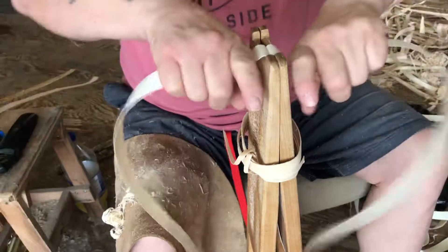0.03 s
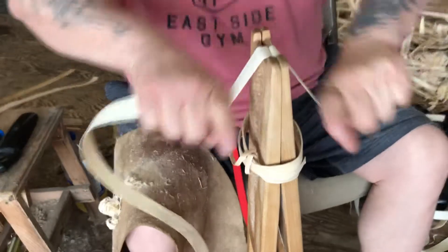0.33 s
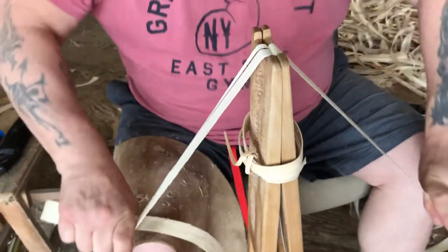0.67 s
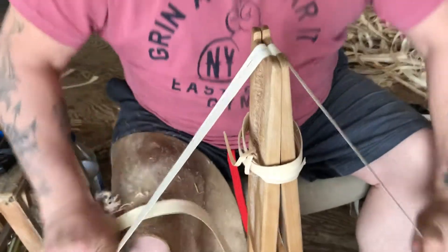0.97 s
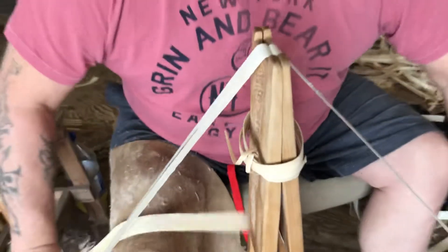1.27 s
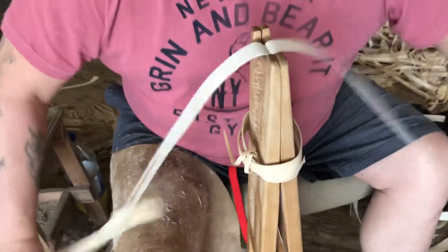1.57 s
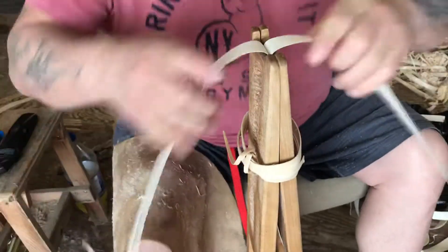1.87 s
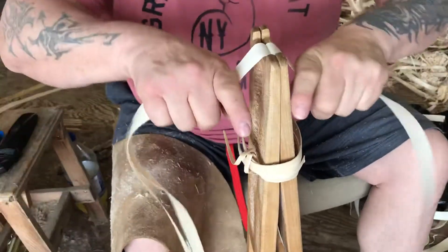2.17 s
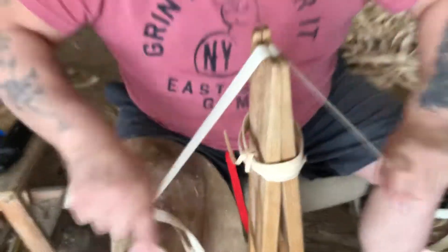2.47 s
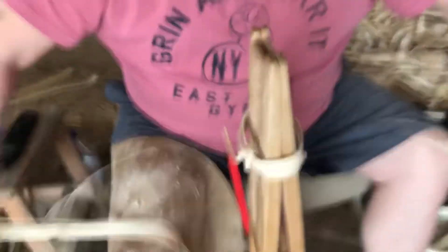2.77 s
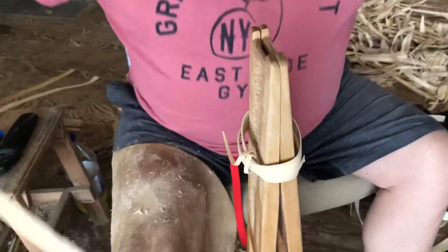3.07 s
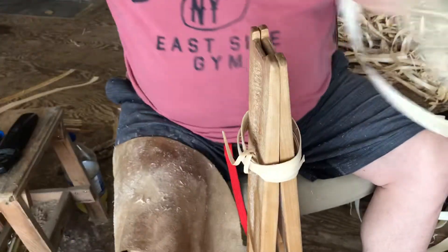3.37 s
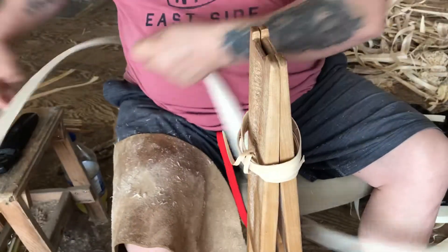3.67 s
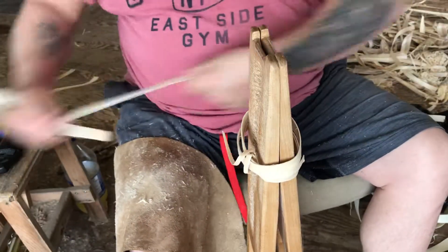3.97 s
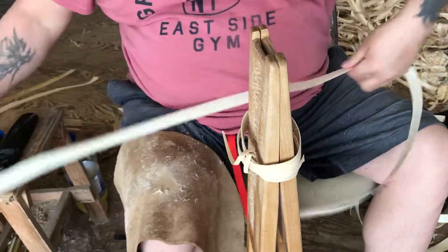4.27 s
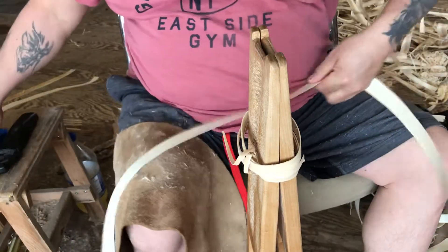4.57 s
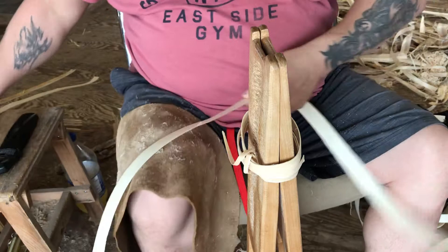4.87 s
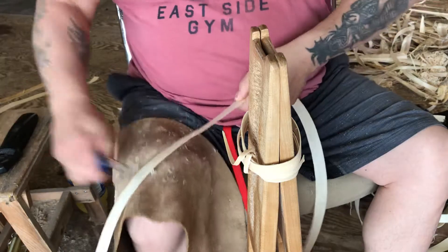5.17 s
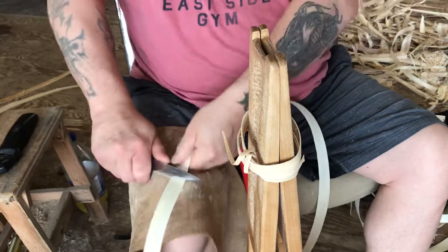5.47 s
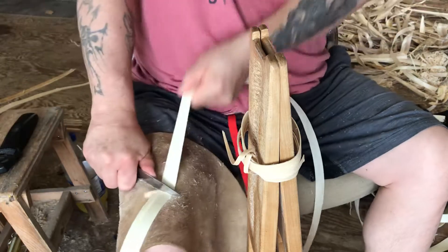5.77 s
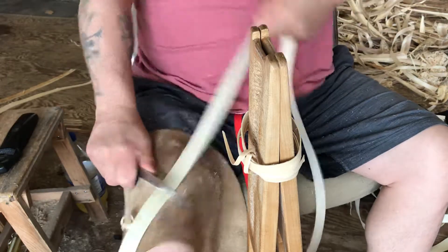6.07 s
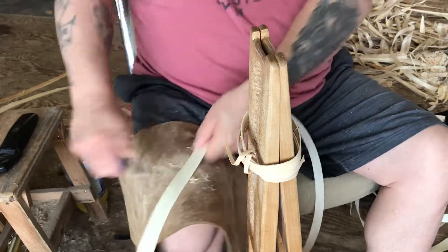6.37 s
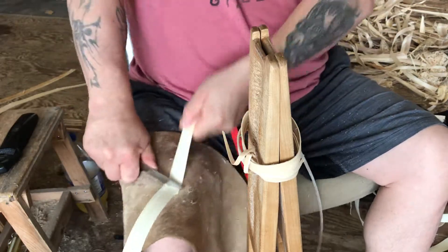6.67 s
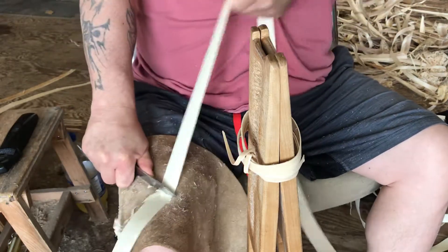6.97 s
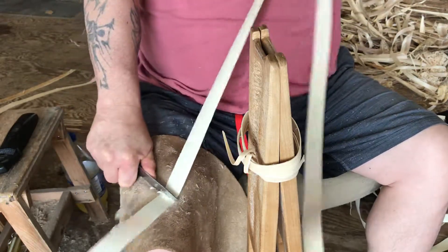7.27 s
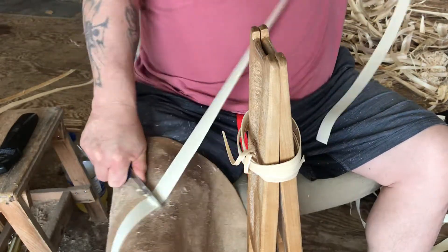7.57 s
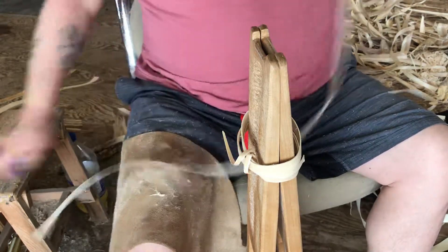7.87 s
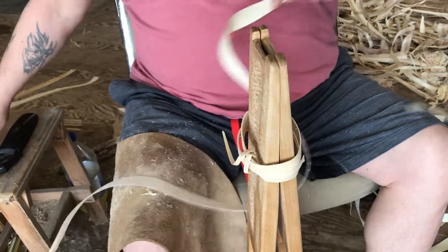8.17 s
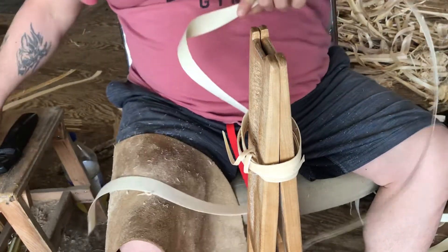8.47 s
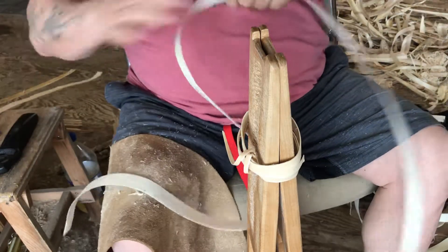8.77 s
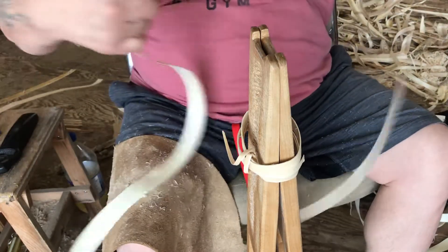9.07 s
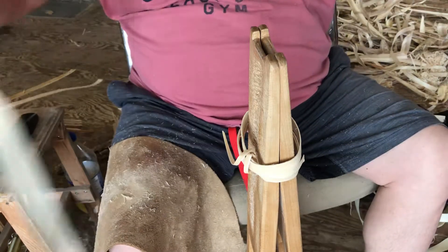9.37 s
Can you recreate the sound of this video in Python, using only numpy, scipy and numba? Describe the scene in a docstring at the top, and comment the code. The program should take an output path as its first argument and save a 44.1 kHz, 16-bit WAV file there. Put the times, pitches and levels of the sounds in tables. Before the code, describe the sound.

A steady low electrical hum fills a small workshop, and all the action is close, with a little room reverberation. From the start, a thin wooden splint is pulled apart in short fibrous rips at about 0.5, 1.1, 1.5, 2.5 and 2.8 seconds, with faint crackling and low drumming from the taut halves. The last pull brings a sharp, loud crack. From 3 to 5.3 seconds the springy strip ticks, slaps and knocks hollowly, hissing through the fingers around 4 seconds. A knife rasps along the wood from 5.6 to 6.1 seconds, then again for longer from 6.5 to 7.8, bright and uneven with shifting pitch and a few sharp clicks. Around 8.5 seconds come hollow knocks, dull thuds and dry snaps. A soft sliding hiss follows from about 9 seconds, over the continuing hum.

```python
"""Splitting and scraping a basket splint

A basket maker pulls a wooden splint apart in a wooden clamp: fibres tear in bunches and the taut
halves drum. The springy strip ticks, slaps, knocks and hisses through the fingers, then is drawn
twice under a knife on a leather knee pad, the edge rasping as it sticks and slips on the grain.
A mains hum fills the small workshop."""
import sys
import numpy as np
from scipy import signal
from scipy.fft import rfft, irfft
from scipy.io import wavfile
from scipy.ndimage import uniform_filter1d, map_coordinates
from numba import njit

SR = 44100
rng = np.random.default_rng(int(sys.argv[2]) if len(sys.argv) > 2 else 0)


def persist_wave(psi):
    """Save psi, clipped to +-1, as 16-bit WAV."""
    counts = np.round(np.clip(psi, -1, 1) * 32767).astype(np.int16)
    wavfile.write(sys.argv[1], SR, np.atleast_2d(counts).T)


N = 415863
TIME = np.arange(N) / SR
TOP_HZ = 16000
HISS_SHAPE = 1.96  # a rounder swell: fine hiss holds its level, then stops short

# mains hum partials: (frequency [Hz], rms level [dB])
HUM_PARTIALS = [(58.8, -39), (117.6, -60.5), (294, -65.5), (352.8, -72.5)]
# workshop reverb: (frequency [Hz], t60 [s])
ROOM_DECAY = [(120, 0.89), (500, 0.64), (1500, 0.45), (4000, 0.33), (8000, 0.28), (15000, .12)]
# EQ of room air, touched wood, sliding skin, blade rasp and tearing fibres: (frequency [Hz], gain [dB])
AIR_EQ = [(60, 9.5), (110, 1), (180, 4), (280, -5), (420, -7), (800, -7.5), (1500, -9), (4200, -16),
          (7000, -25), (16000, -25)]
WOOD_EQ = [(150, 19), (400, 2.5), (800, 4.5), (1200, 4), (2300, 0.5), (3000, 1), (4300, 2), (5200, -2),
           (9000, -2), (12000, -2), (16000, -15)]
SLIDE_EQ = [(600, -48), (1400, -8), (2400, 3), (3900, 4.5), (7600, -1.5), (9000, -0.5), (12000, -6),
            (16000, -9)]
RASP_EQ = [(150, -31), (350.0, -12), (550.0, -19), (800.0, -18), (1100.0, -6), (1600.0, -1.4),
           (2200.0, -0.8), (3200.0, -4.5), (4600.0, -5.0), (6200.0, -9.0), (7600.0, -11), (9200.0, -10.5),
           (12000.0, -10), (16000.0, -20)]
TEAR_EQ = [(200, -2), (300, 0), (420, -14), (570, -0.5), (780, -6.5), (1270, -5), (1880, -4), (2350, -3),
           (3000, -1), (4400, -1), (5000, -2), (8800, -3.5), (11800, -6.5), (16000, -13.5)]
# resonances of hard-struck wood: (frequency [Hz], width [Hz], gain [dB])
WOOD_RESONANCES = [(580, 50, 5), (1250, 280, 7), (1600, 200, 1), (2330, 280, 10), (3350, 300, 1),
                   (4400, 350, 4.5)]
# low resonances of the clamp and taut halves: (frequency [Hz], half-width per filter [Hz], gain [dB])
CLAMP_RESONANCES = [(98.3, 12.1, 9), (124, 11, -5.5), (174, 27, -10), (230, 103, -8.5), (264, 20, -2.5)]
# modes of a hollow knock: (base frequency [Hz], gain [dB], base t60 [s])
HOLLOW_MODES = [(404, -20, .2), (522, -3, .19), (619, 1, .2), (790, -12, .14), (856, -3, .16),
                (950, -8, .13), (1080, -11, .14), (1211, -6, .15), (1500, -15, .1)]
# hands and cloth brush the strip: (middle [s], length [s], level [dB], centre [Hz])
BRUSH_STROKES = [(0.058, 0.05, -45, 6500), (0.774, 0.18, -50, 5000), (1.264, 0.22, -54, 4850),
                 (1.764, 0.59, -57.5, 3700), (3.111, 0.11, -43, 2870), (3.564, 0.22, -49, 4200),
                 (4.4, 0.32, -54.5, 2800), (4.815, 0.036, -47.5, 3000), (5.156, 0.25, -62, 4300),
                 (5.459, 0.25, -46, 4400), (5.583, 0.093, -47, 3000), (6.124, 0.17, -45.5, 3500),
                 (6.37, 0.49, -53.5, 4030), (7.88, 0.12, -54, 3900), (7.98, 0.07, -55, 3900),
                 (8.29, 0.21, -52, 4500), (8.338, 0.39, -53, 680)]
# patches of crackling fibres: (start [s], end [s], peak ceiling [dB])
CRACKLE_PATCHES = [(0, 0.298, -41), (0.694, 0.951, -42), (1.208, 1.696, -36), (1.879, 2.245, -31),
                   (2.953, 3.596, -37), (4.252, 4.803, -38), (4.905, 5.599, -48), (6.202, 6.458, -36),
                   (7.8, 8.049, -44), (8.191, 8.603, -43)]
# the strip slides through the fingers: (fastest moment [s], level [dB], rise [s], fall [s],
# top octave gain [dB], resonance [Hz], its climb over one rise [octaves])
FINGER_SLIDES = [(4.069, -38, 0.2, 0.18, 3, 3720, .8), (9.07, -44.5, 0.15, 0.12, -3.5, 3920, .05),
                 (9.26, -49.5, 0.22, 0.45, -6, 3780, 0.65), (9.39, -47.5, 0.14, 0.13, -10, 3000, .05)]
# heavy thuds of the clamp and seat: (time [s], peak [dB], centre [Hz])
SEAT_THUDS = [(1.111, -25.5, 99), (2.779, -24.5, 255), (2.783, -24.5, 104), (5.058, -39, 123),
              (7.15, -37, 330), (8.4, -38, 158), (8.53, -27, 114), (8.666, -32, 99)]
# hollow knocks of the loose end: (time [s], peak [dB], centre [Hz], ring time [x base],
# travel along the strip at 1 kHz [s], pitch set by the free length [x base], width [x centre])
END_KNOCKS = [(2.11, -26, 820, 0.3, 0.00096, 1.3, 1.1), (2.161, -25.5, 800, 0.2, 0.00052, 1.53, 1.6),
              (3.685, -21.5, 775, 0.64, 0.0017, 1.2, 1), (4.121, -29.5, 700, 0.37, 0.0011, 1.03, 1.6),
              (4.488, -16, 567, 0.094, 0.0011, 1.1, 1.6), (4.816, -24.5, 1094, 0.46, 0.0096, 1.72, 1.35),
              (6.454, -37, 510, .7, 0.00074, .826, 0.2), (8.514, -18, 660, 1.23, 0.002, 1, 1.8),
              (8.541, -21, 560, 0.7, .002, 0.98, 1.5), (9.006, -35.5, 686, 0.082, 0.0013, 0.97, 1.6)]
# dry ticks and snaps: (time [s], peak [dB], centre [Hz], 30 dB decay [s], room send [dB])
STRIP_TICKS = [(0.053, -32, 6450, 0.022, -4), (.108, -31.5, 2340, 0.018, -9),
               (0.2316, -29.5, 4600, 0.026, -3), (0.681, -25.5, 3500, 0.015, -2),
               (1.058, -24.5, 2320, 0.011, -2), (1.316, -32, 1700, 0.017, -7),
               (1.547, -34, 3660, 0.0084, -10), (1.569, -28.5, 3700, 0.023, -5),
               (1.6, -31, 6300, 0.0065, -10), (1.627, -28, 5030, .008, -2), (1.765, -22.5, 5030, 0.013, -5),
               (1.941, -38, 5330, 0.011, 8), (3.236, -32, 3310, 0.022, -24), (3.296, -23, 4700, 0.007, -6),
               (3.371, -28, 5060, 0.011, -4), (3.487, -20.5, 2720, 0.012, 4),
               (3.567, -27, 4500, 0.014, -15), (3.616, -19.5, 2040, 0.016, 1.5),
               (3.757, -21, 4460, 0.037, 1), (4.166, -21.5, 5200, 0.025, -1),
               (4.225, -25, 3350, 0.015, 1.5), (4.272, -28, 3600, .006, -5),
               (4.3005, -28.5, 3670, 0.0081, -10), (4.6196, -21, 3440, 0.0042, -3),
               (4.954, -34.5, 4000, .02, 2), (5.237, -36, 6300, 0.0091, 5), (5.3, -25.5, 3700, 0.011, 1.5),
               (6.212, -31, 5900, 0.011, 7), (7.069, -20, 3400, 0.033, -14),
               (7.151, -16, 4500, 0.0086, -12), (8.1963, -24.5, 3620, 0.014, -4),
               (8.485, -25, 5130, 0.0069, 0), (8.517, -25, 4500, .008, -3), (8.6693, -16, 7000, 0.0061, -3),
               (8.718, -21.5, 3330, 0.0052, -3.5), (8.9184, -24, 2830, 0.01, -5)]
# the strip cracks, slaps wood or meets the blade:
# (time [s], peak [dB], centre [Hz], 30 dB decay [s], width [x centre], rise [s], room send [dB])
STRIP_SLAPS = [(1.111, -11.5, 1950, 0.017, 0.55, 0.0011, -6), (2.111, -25.5, 1310, .008, 8.3, 0.00063, 1),
               (2.16, -28, 1690, 0.027, 4.7, 0.0023, 1), (2.45, -9.5, 1930, 0.007, 0.73, 0.0022, -8.5),
               (2.781, -0.5, 2800, 0.02, 2, 0.00097, -9), (3.671, -12, 3190, 0.0078, 0.75, 0.00029, -1.5),
               (3.684, -15, 2050, 0.01, 2.2, 0.00037, -5), (3.691, -18.5, 2020, 0.083, 1.6, 0.0009, 0),
               (4.118, -9, 6840, 0.018, 1.6, 0.00407, -5.5), (4.487, -9, 1840, 0.0083, 0.94, .0002, -5),
               (6.5255, -7.5, 5000, 0.0006, 4.3, 0.00029, -12), (7.196, -11, 5000, 0.004, 3.8, 0.00029, -6),
               (8.6705, -12.5, 2630, 0.0087, 0.33, 0.00042, -12)]
# rasp envelopes, one per draw under the blade: (time [s], level before grip, ringing and trim [dB])
BLADE_DRAWS = [
    [(5.615, -49), (5.644, -33.5), (5.778, -29), (5.993, -24.5), (6.022, -28), (6.076, -44.5)],
    [(6.559, -52), (6.639, -30.5), (6.71, -28.5), (7.036, -32.5), (7.063, -40), (7.072, -31),
     (7.092, -25.5), (7.155, -25), (7.18, -35), (7.21, -30), (7.302, -36.5), (7.42, -35), (7.455, -31.5),
     (7.717, -39), (7.8, -62)],
]
# the blade contact rings in glides as its angle shifts:
# (start [s], end [s], from [Hz], to [Hz], gain over the rasp [dB], width [x centre])
BLADE_GLIDES = [(5.603, 6.078, 3910, 4100.0, 16.5, 0.37), (5.62, 5.953, 5850.0, 7100, 16, 0.25),
                (5.916, 6.083, 4600.0, 7100, 13, 0.2), (5.887, 6.158, 3100, 3060, 11.5, 0.43),
                (6.515, 7.045, 3720, 4560, 13, 0.41), (6.605, 6.87, 6160, 7100, 15.5, 0.17),
                (6.811, 7.016, 5330.0, 5240, 13, 0.14), (6.872, 7.102, 3130.0, 3600, 12.5, 0.23),
                (7.017, 7.173, 4040, 3370, 13.5, 0.24), (6.909, 7.063, 8100, 8540.0, 12.5, 0.15),
                (7.042, 7.308, 5970.0, 7200, 8.5, 0.21), (7.197, 7.357, 3150, 5400, 9.5, 0.25),
                (7.293, 7.415, 5310.0, 5200, 14, 0.14), (7.286, 7.457, 8190.0, 8000, 13.5, 0.21),
                (7.274, 7.695, 4170, 4100, 13.5, 0.3), (7.471, 7.809, 5110.0, 7520.0, 11, 0.25),
                (7.322, 7.774, 2100, 1430, 4.4, 0.25), (7.441, 7.777, 8300, 10170.0, 8.6, 0.32)]
# each pull runs the split further:
# (fastest moment [s], level [dB], rise [s], fall [s], top octave gain [dB], drumming level [dB])
SPLIT_PULLS = [(.46, -33.5, 0.17, 0.29, -3.5, -38.5), (1.117, -33, 0.17, 0.11, -3, -34),
               (1.454, -39.5, 0.094, 0.082, -2, -40.5), (1.6, -47, 0.076, 0.11, -11, -45.5),
               (2.472, -32.5, 0.15, 0.2, -1.5, -40.5), (2.799, -30, 0.18, 0.19, -5, -35.5)]


def undb(db):
    """Decibels to gain."""
    return 10 ** (np.asarray(db) / 20)


def unit(x):
    """Scale to rms 1."""
    return x / np.sqrt(np.mean(x ** 2))


def peak(x, db):
    """Scale to a peak level."""
    return x * undb(db) / np.abs(x).max()


def add(out, s, x):
    """Mix x into out at time s."""
    i = int(s * SR)
    out[i:i + len(x)] += x[:N - i]


def on_log(hz, points):
    """Read (frequency, value) points on a log-frequency axis."""
    freqs, values = np.transpose(points)
    return np.interp(np.log(np.maximum(hz, 1)), np.log(freqs), values)


def eq(x, points, size=2048):
    """Minimum-phase EQ that rolls off below its first point."""
    hz = np.arange(size // 2 + 1) * SR / size
    gain = undb(on_log(hz, points)) * np.minimum((hz + 1) / points[0][0], 1) ** 2
    cepstrum = irfft(np.log(gain))
    cepstrum[1:size // 2] *= 2
    cepstrum[size // 2 + 1:] = 0
    return signal.fftconvolve(x, irfft(np.exp(rfft(cepstrum))))[:len(x)]


@njit
def svf(x, hz, width):
    """State-variable band-pass, gain 1 at its moving centre."""
    y, band_state, low_state = np.empty(len(x)), 0., 0.
    for i in range(len(x)):
        g, damping = np.tan(np.pi * hz[i] / SR), width[i] / hz[i]
        passed = (band_state + g * (x[i] + 1e-18 - low_state)) / (1 + g * (g + damping))
        band_state = 2 * passed - band_state
        low_state += 2 * g * passed
        y[i] = damping * passed
    return y


def band(x, hz, width):
    """One resonance, steady or swept; width in Hz."""
    return svf(x, np.minimum(hz, TOP_HZ) * np.ones(len(x)), width * np.ones(len(x)))


def steep_band(x, hz, width):
    """The same resonance twice, for steeper skirts."""
    return band(band(x, hz, width), hz, width)


def split_top(x):
    """Cross over at 8 kHz into body and top octave, each at rms 1."""
    top = signal.sosfiltfilt(signal.butter(4, 8000, "high", fs=SR, output="sos"), x)
    return unit(x - top), unit(top)


def wander(rate):
    """Slewed random modulation, rate steps a second, rms 1."""
    hold = max(int(SR / rate), 1)
    steps = np.repeat(rng.standard_normal(N // hold + 1), hold)
    return unit(uniform_filter1d(steps, hold)[:N])


def grains(rate, spread_db):
    """Tiny random fractures of unequal size, rate a second, rms 1."""
    hit = rng.random(N) < rate / SR
    size = undb(spread_db * np.minimum(rng.exponential(size=N), 5))
    return unit(hit * size * rng.choice([-1, 1], N))


def swell(s, db, rise_s, fall_s, tilt_db=0, shape=1.34, drop_db=22.5):
    """Envelope of an arm movement that speeds up until s, then slows; tilt_db favours its start."""
    progress = np.clip((TIME - s) / np.where(TIME < s, rise_s, fall_s), -4, 4)
    return undb(db - drop_db * np.abs(progress) ** shape - tilt_db * progress)


def room_tone():
    """The bed: a motor's steady mains hum over faint air."""
    hum = 0
    for hz, db in HUM_PARTIALS:
        amplitude = np.sqrt(2) * undb(db + 0.12 * wander(2.07))
        hum += amplitude * np.sin(2 * np.pi * (hz * TIME + rng.random()))
    air = unit(eq(rng.standard_normal(N), AIR_EQ))
    return hum + undb(-54.5 + 0.042 * wander(2.3)) * air


def reverb(send, size=24000):
    """Diffuse workshop reflections build quickly and lose their treble first."""
    t, tail = np.arange(size) / SR, 0
    for hz in np.geomspace(125, 16000, 8):
        decay = undb(-60 * t / on_log(hz, ROOM_DECAY) - 4 * hz / 8000)
        tail += steep_band(rng.standard_normal(size), hz, hz) * decay
    tail *= 1 - np.exp(-t / 0.0026)
    mid_gain = np.sqrt(np.mean(np.abs(rfft(tail)[size // 50:size // 10]) ** 2))
    return signal.fftconvolve(send, tail / mid_gain)[:N]


def rustling():
    """Hands and cloth brush the strip, which never lies quite still."""
    pressure = undb(2.2 * wander(45))
    touch = grains(rate=5500, spread_db=2) * pressure + undb(-20) * grains(rate=300, spread_db=1)
    touch, out = eq(touch, WOOD_EQ), np.zeros(N)
    for s, length_s, db, hz in BRUSH_STROKES:
        contact = np.hanning(int(length_s * SR))
        start = s - length_s / 2
        stroke = touch[int(start * SR):][:len(contact)]
        add(out, start, unit(band(stroke, hz, 1.6 * hz)) * contact * undb(db))
    fidget = undb(-67 + 5 * wander(8)) * unit(band(touch, hz=3250, width=7600))
    return out + fidget


def crackling(per_s=150, spread_db=16, decay_s=0.0025, low_hz=2800, high_hz=8600):
    """Loose fibres flick against the fingers: tiny pings, each with its own pitch and strength."""
    out, t = np.zeros(N), np.arange(512) / SR
    for start, end, db in CRACKLE_PATCHES:
        for when, softness, pitch in rng.random((int(per_s * (end - start)), 3)):
            hz = low_hz * (high_hz / low_hz) ** pitch
            ping = band(rng.standard_normal(len(t)) * np.exp(-t / decay_s), hz, 0.35 * hz)
            add(out, start + when * (end - start), peak(ping, db - spread_db * np.sqrt(softness)))
    return out


def sliding(ring_gain=0.63):
    """Skin on smooth wood gives a fine hiss; a resonance rises as the free length shortens."""
    hiss, out = eq(grains(rate=14000, spread_db=3), SLIDE_EQ), 0
    for s, db, rise_s, fall_s, top_db, centre_hz, octaves in FINGER_SLIDES:
        hz = centre_hz * 2 ** (octaves * np.clip((TIME - s) / rise_s, -1, 1))
        body, top = split_top(hiss + ring_gain * steep_band(hiss, hz, 0.35 * hz))
        out += (body + undb(top_db) * top) * swell(s, db, rise_s, fall_s, shape=HISS_SHAPE)
    return out


def clamp(push):
    """Low resonances of the clamp with the strip stretched over it."""
    return sum(undb(db) * steep_band(push, hz, 2 * half) for hz, half, db in CLAMP_RESONANCES)


def wood(push):
    """Short-lived resonances of the strip and the clamp jaws."""
    return sum(undb(db) * band(push, hz, width) for hz, width, db in WOOD_RESONANCES)


def thud(db, hz, decay_s=0.063, size=16384):
    """A dull, dying shudder of the clamp and seat."""
    push = rng.standard_normal(size) * np.exp(-np.arange(size) / SR / decay_s)
    return peak(steep_band(clamp(push) + 0.33 * push, hz, hz), db)


def disperse(x, lag_s):
    """Bending waves along the strip: the treble arrives first, 1 kHz comes lag_s late."""
    hz = np.maximum(np.arange(len(x) // 2 + 1) * SR / len(x), 1)
    return irfft(rfft(x) * np.exp(-4j * np.pi * lag_s * np.sqrt(1000 * hz)))


def knock(db, hz, ring, travel_s, pitch, width, size=16384):
    """Hollow modes and a short rattle run along the strip; the freer the end, the cleaner it rings."""
    t, modes = np.arange(size) / SR, 0
    for mode_hz, mode_db, t60 in HOLLOW_MODES:
        decay = undb(mode_db - 60 * t / (t60 * ring))
        modes += decay * np.sin(2 * np.pi * (pitch * mode_hz * t + rng.random()))
    rattle = 2.4 * rng.standard_normal(size) * np.exp(-t / 0.014)
    rattle[0] += 45  # attack click
    hollow = steep_band(modes + rattle / (1 + 0.5 * ring), hz, width * hz)
    return peak(disperse(hollow, travel_s), db)


def crack(db, hz, decay_s, width, woody, rise_s=0.0009175, size=4096):
    """Contact builds, releases and chatters; returns the direct sound and its room feed."""
    t = np.arange(size) / SR - rise_s
    release = 1. * (np.arange(size) == int(rise_s * SR))
    chatter = rng.standard_normal(size) * undb(np.where(t < 0, 20 * t / rise_s, -30 * t / decay_s))
    # the chatter's ripples average out over all directions, so the room gets the clean release
    pushes = eq(chatter + 3.21 * release, WOOD_EQ), eq(release, WOOD_EQ)
    direct, spread = (band(push + woody * wood(push), hz, width * hz) for push in pushes)
    direct = peak(direct, db)
    return direct, unit(spread) * direct.std()


def impacts():
    """The springy strip ticks, slaps and knocks, the seat thuds; returns direct sound and room send."""
    close, send = np.zeros((2, N))
    for s, db, hz, decay_s, send_db in STRIP_TICKS:
        direct, spread = crack(db, hz, decay_s, width=1, woody=0.13)
        add(close, s, direct)
        add(send, s, spread * undb(send_db))
    for s, db, hz, decay_s, width, rise_s, send_db in STRIP_SLAPS:
        direct, spread = crack(db, hz, decay_s, width, woody=0.28, rise_s=rise_s)
        add(close, s - rise_s, direct)
        add(send, s, spread * undb(send_db))
    for s, db, hz, ring, travel_s, pitch, width in END_KNOCKS:
        hollow = knock(db, hz, ring, travel_s, pitch, width)
        add(close, s, hollow + thud(db - 16.5, hz=150))  # every knock also jolts the seat
        add(send, s, hollow * undb(-8))
    for s, db, hz in SEAT_THUDS:
        add(close, s, thud(db, hz))
    return close, send


def draw_envelope():
    """Level of the draws under the blade, gated to silence around each."""
    times, db = np.vstack(BLADE_DRAWS).T
    gate = sum((TIME >= draw[0][0]) & (TIME <= draw[-1][0]) for draw in BLADE_DRAWS)
    return undb(np.interp(TIME, times, db)) * uniform_filter1d(np.minimum(gate, 1.), size=500)


def scraping(echo_s=0.001346, trim_db=-0.15):
    """The edge sticks and slips over the grain; gliding resonances come and go with the blade angle."""
    grip = unit(undb(wander(220) + 0.6 * wander(40)))
    rasp = unit(eq(grains(rate=14000, spread_db=0.5), RASP_EQ))
    wobble = 1 + 0.02 * wander(25)
    blade = rasp * grip
    for start, end, from_hz, to_hz, db, width in BLADE_GLIDES:
        span = slice(int(start * SR), int(end * SR))
        progress = np.linspace(0, 1, len(grip[span]))
        hz = from_hz * (to_hz / from_hz) ** progress * wobble[span]
        slips = np.roll(rasp, rng.integers(N))[span] * grip[span]  # each spot slips on its own
        ring = band(band(slips, hz, 0.84 * width * hz), hz, width * hz)
        add(blade, start, undb(db) * np.sin(np.pi * progress) * ring)
    # waves return from the nearby end of the blade and comb the spectrum
    lag = SR * echo_s * (1 + 0.1 * wander(9))
    echo = map_coordinates(blade, [np.arange(N) - lag], order=3)
    return undb(trim_db) * (blade + 0.2 * echo) * draw_envelope()


def tearing():
    """Fibres part in uneven bunches, ring the wood and tug the clamp; each pull dulls as it runs."""
    bunching = undb(1.1 * wander(120) + 0.6 * wander(35))
    fibres = grains(rate=8000, spread_db=2) * bunching
    rip = eq(fibres, TEAR_EQ)
    body, top = split_top(rip + 0.22 * wood(rip))
    drum, out = unit(clamp(fibres)), 0
    for s, db, rise_s, fall_s, top_db, drum_db in SPLIT_PULLS:
        out += body * swell(s, db, rise_s, fall_s)
        out += top * swell(s, db + top_db, rise_s, fall_s, tilt_db=7.5, shape=HISS_SHAPE)
        out += drum * swell(s, drum_db, rise_s, fall_s)
    return out


def scene():
    """Mono mix: close impacts and friction, their reverb, and the room tone beneath."""
    hits, hit_send = impacts()
    friction = tearing() + scraping() + sliding() + rustling() + crackling()
    reflections = reverb(hit_send + undb(-9.5) * friction)
    return (hits + friction + reflections + room_tone())[None]


def record(dry):
    """The microphone port dips a narrow band of the treble; a steep low-pass cuts the top."""
    notched = dry - 0.64 * band(dry[0], hz=10410, width=1070)
    return signal.sosfilt(signal.ellip(10, 0.2, 80, TOP_HZ, fs=SR, output="sos"), notched)


dry = scene()
out = record(dry)
persist_wave(out)
```